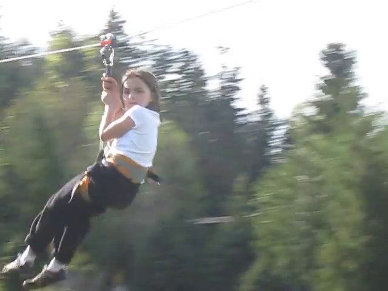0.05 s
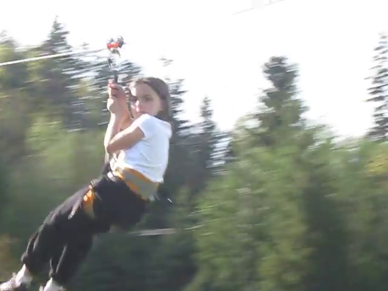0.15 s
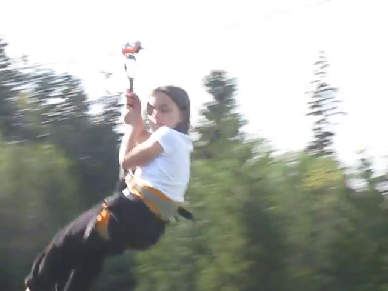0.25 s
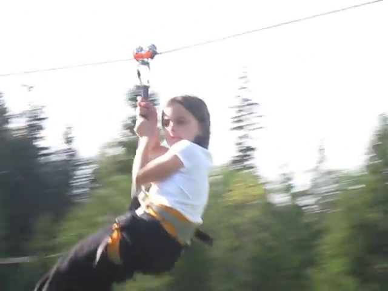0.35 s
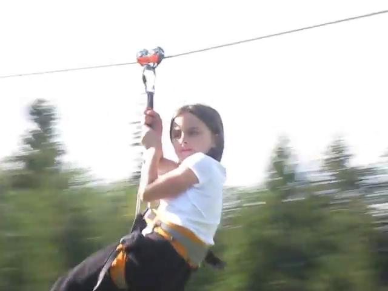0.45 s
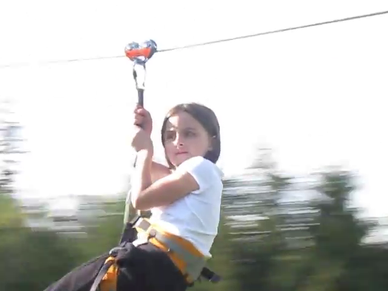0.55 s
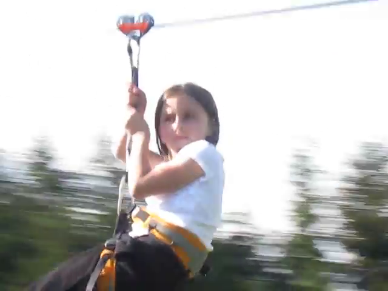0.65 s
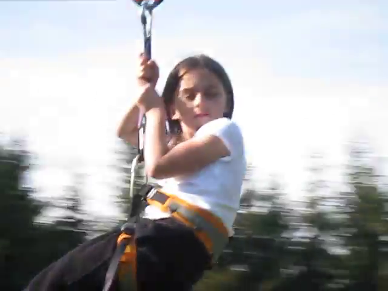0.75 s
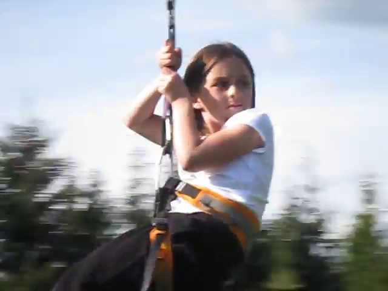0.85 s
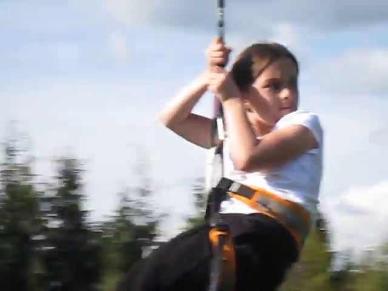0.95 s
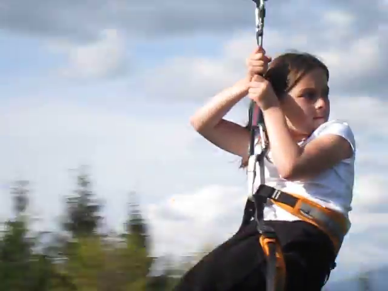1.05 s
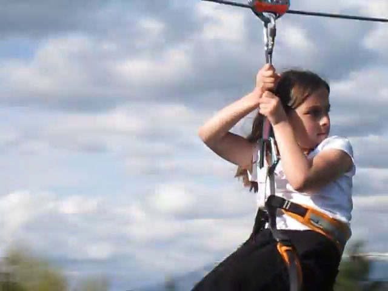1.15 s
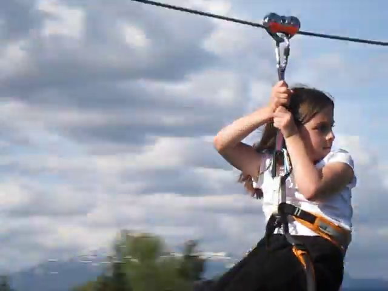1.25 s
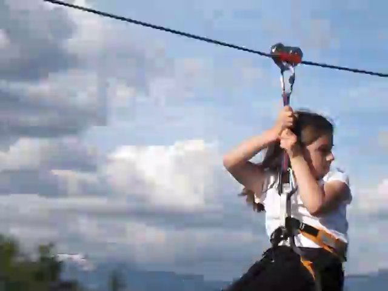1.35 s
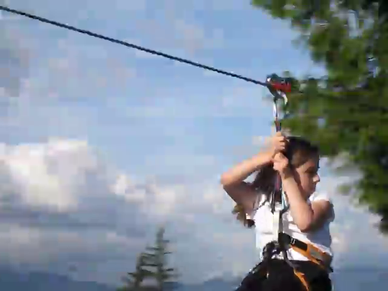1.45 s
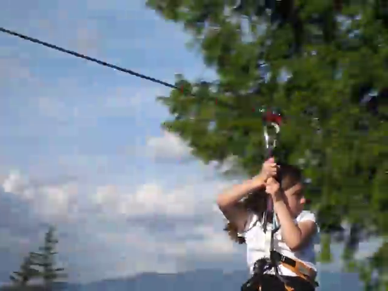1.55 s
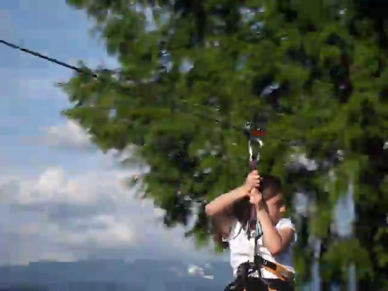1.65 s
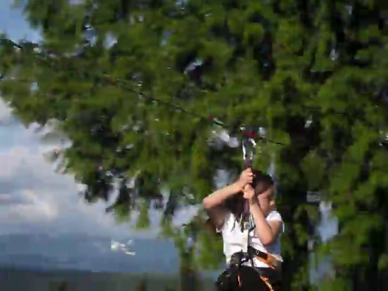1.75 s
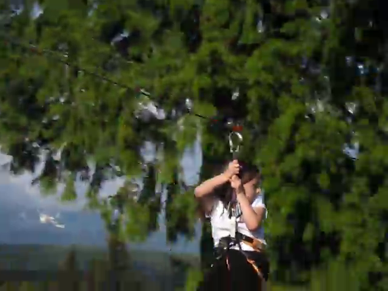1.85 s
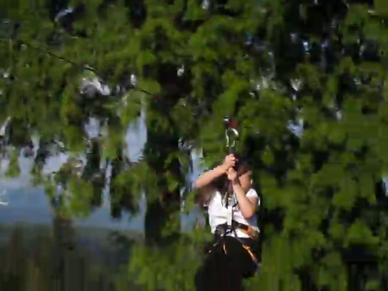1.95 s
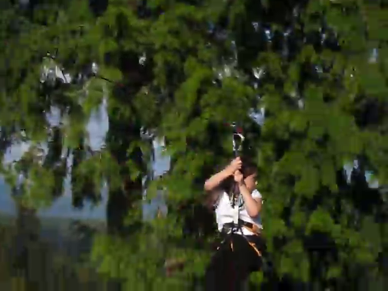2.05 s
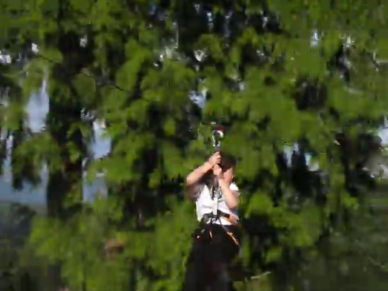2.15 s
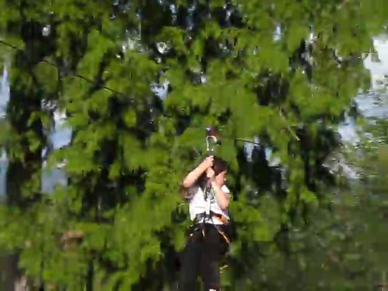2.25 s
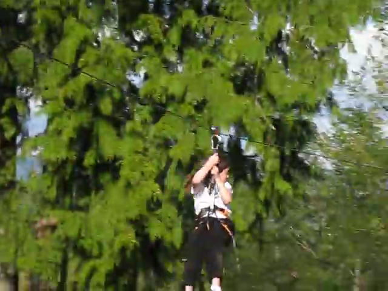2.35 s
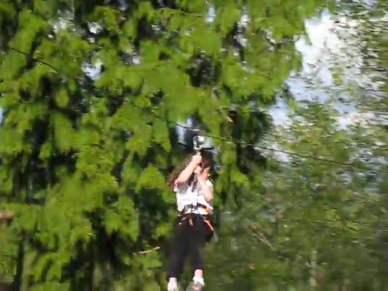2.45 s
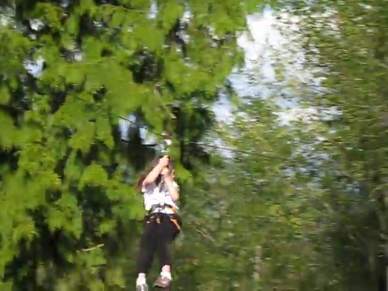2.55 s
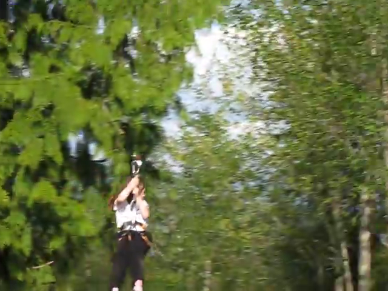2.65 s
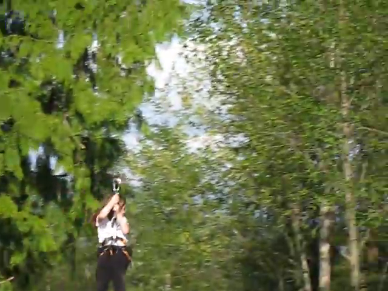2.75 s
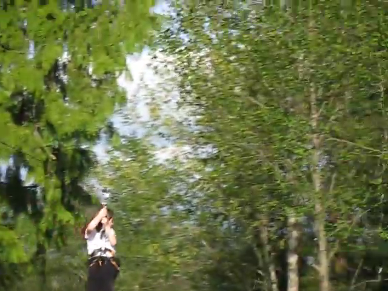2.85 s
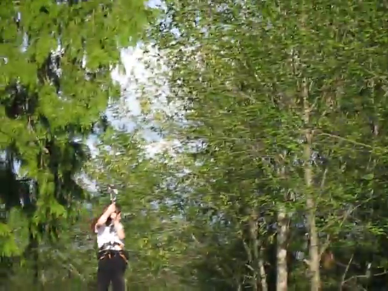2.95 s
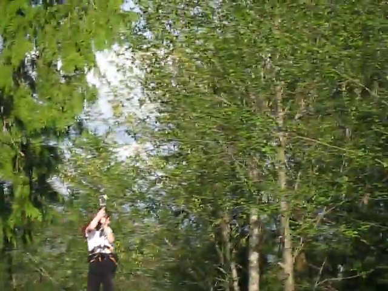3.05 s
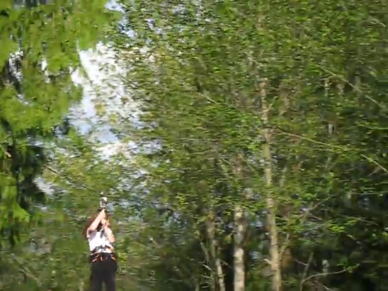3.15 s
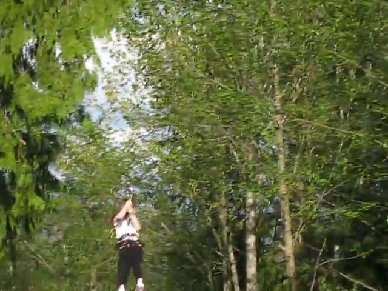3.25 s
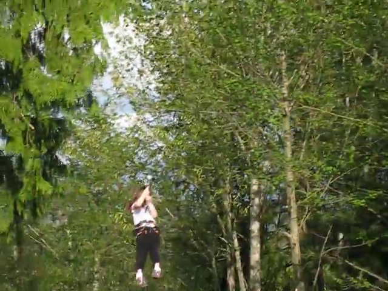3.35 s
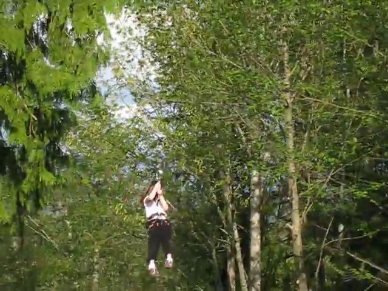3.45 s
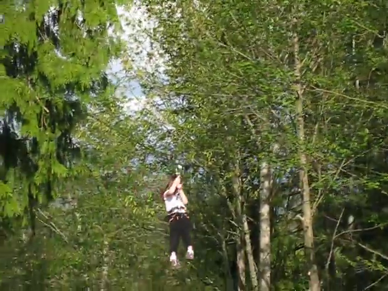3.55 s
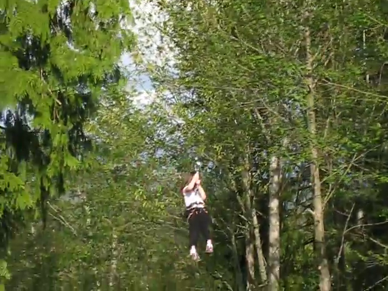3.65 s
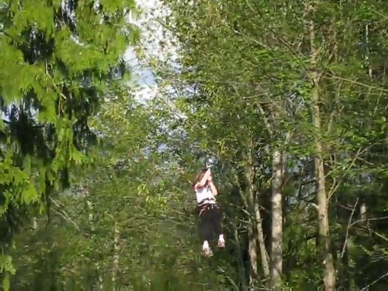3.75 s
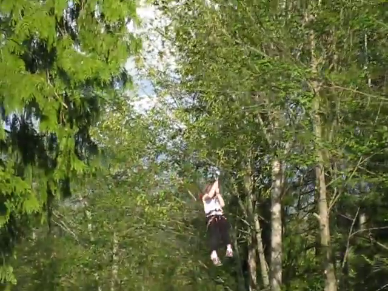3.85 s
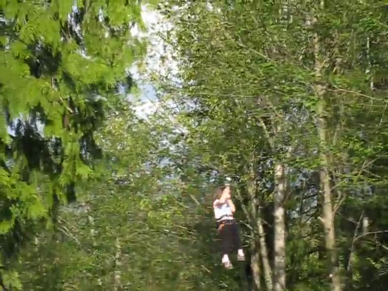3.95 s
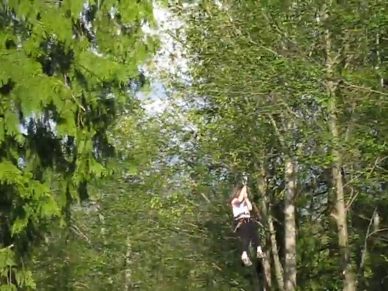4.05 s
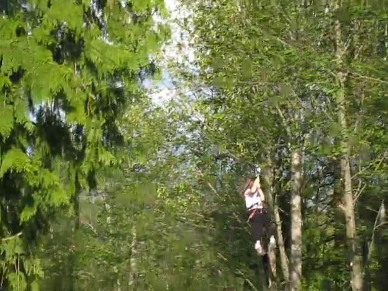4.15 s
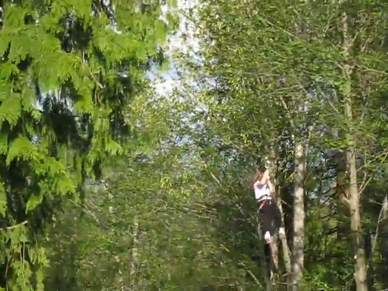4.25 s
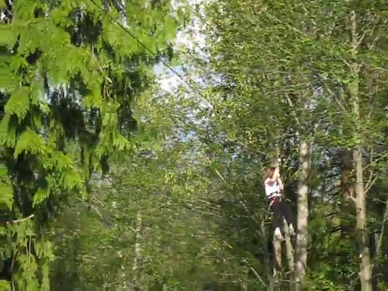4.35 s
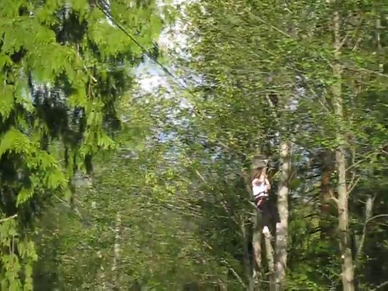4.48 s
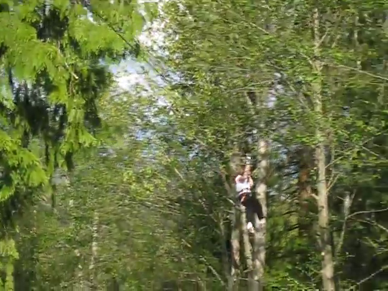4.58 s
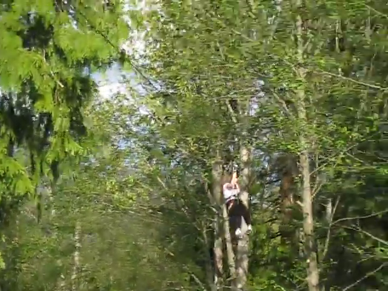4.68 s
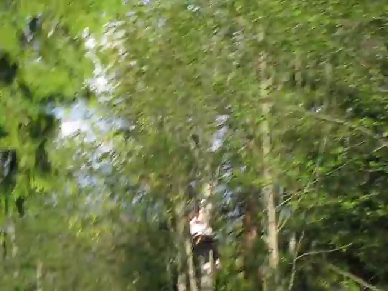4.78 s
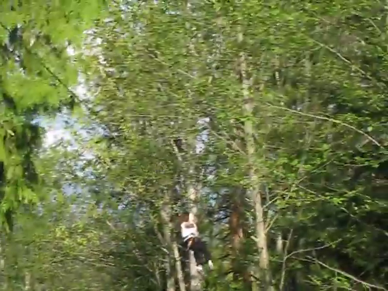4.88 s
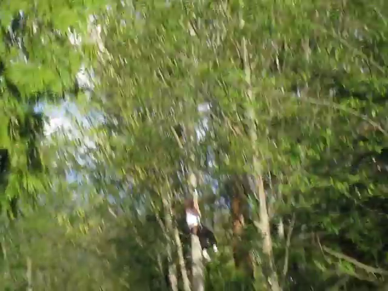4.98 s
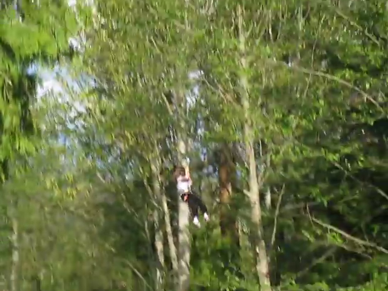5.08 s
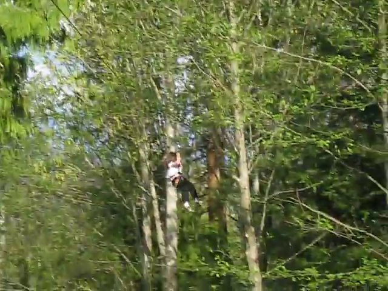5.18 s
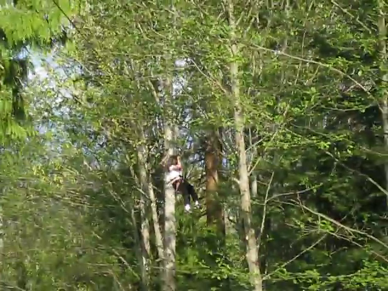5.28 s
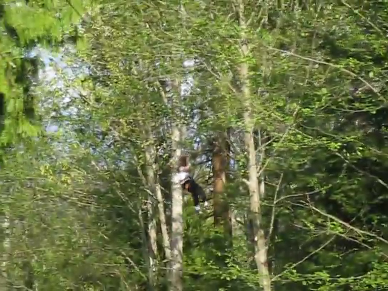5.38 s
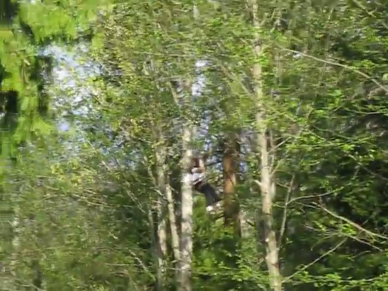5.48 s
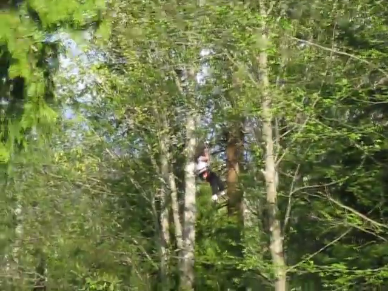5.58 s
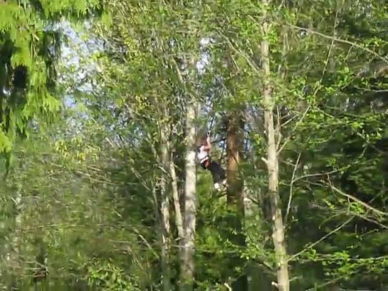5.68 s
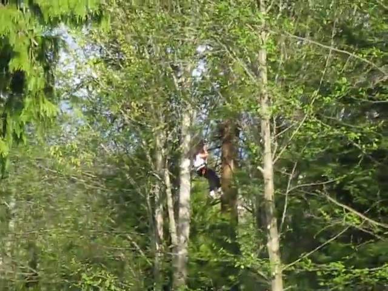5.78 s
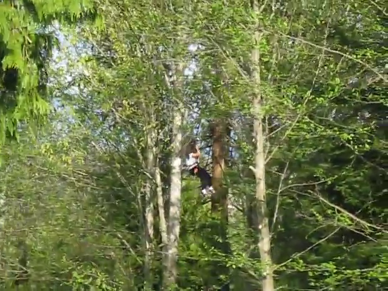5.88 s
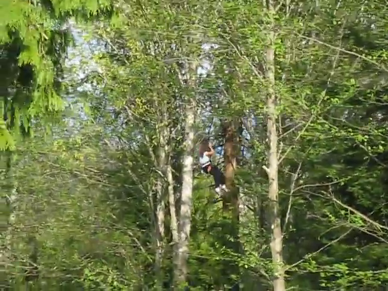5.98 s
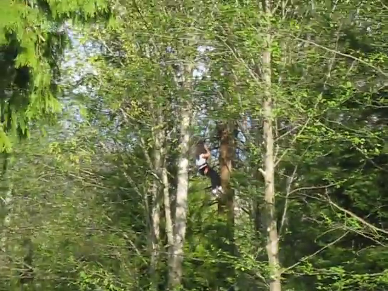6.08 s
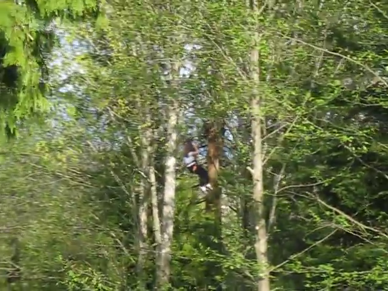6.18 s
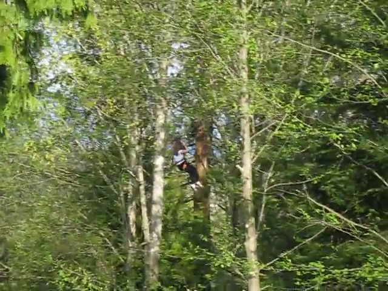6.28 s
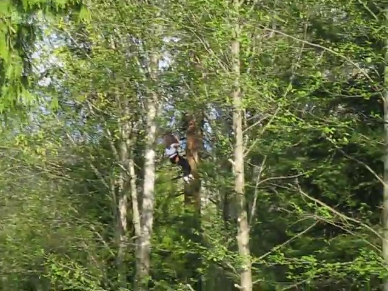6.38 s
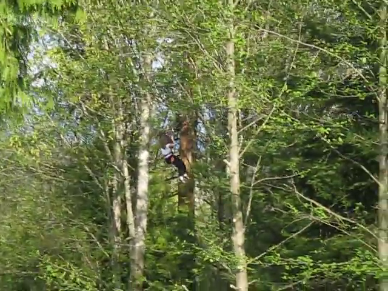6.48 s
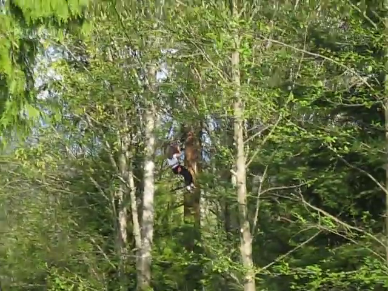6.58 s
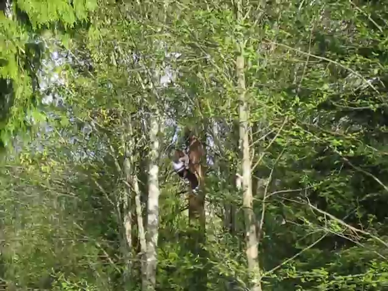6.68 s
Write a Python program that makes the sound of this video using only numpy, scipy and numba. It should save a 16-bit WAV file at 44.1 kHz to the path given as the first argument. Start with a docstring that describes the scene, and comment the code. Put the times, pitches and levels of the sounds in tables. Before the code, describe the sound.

Outdoors at a wood's edge, a pulley trolley carrying a rider is already rolling loudly on a steel cable. Its bright, gritty hiss and metallic ring sweep in colour as it passes within metres at about one second, then dwindle into the trees. A rough whine slowly sinks as it slows. Faint breeze and small wind bumps touch a nearby handheld microphone, sounding the same in both channels.

```python
"""At the edge of a wood, a zipline trolley rolls past a few metres away and on into the trees, slowing.
Its sheaves (grooved wheels) whine over the strands of the steel cable. Noise-fed resonances make the
trolley ring and hiss and the loaded cable drone; the cable also beams a band of sound that sweeps with
the viewing angle. Behind are filtered-noise outdoor air, a light breeze and puffs of wind; the recorder's
gain control holds the level flat while the trolley is close."""
import sys
import numpy as np
from scipy import signal
from scipy.fft import rfft, irfft, next_fast_len
from scipy.io import wavfile
from scipy.ndimage import uniform_filter1d
from numba import njit

SR = 44100
rng = np.random.default_rng(int(sys.argv[2]) if len(sys.argv) > 2 else 0)


def generate_wav(signal):
    """Clip the signal to [-1, 1] and save it as 16-bit WAV at the path in sys.argv[1]."""
    frames = np.transpose(np.atleast_2d(signal))
    scaled = np.clip(frames, -1, 1) * 32767
    pcm = np.round(scaled).astype(np.int16)
    wavfile.write(sys.argv[1], SR, pcm)


N = 296352
T = np.arange(N) / SR   # time of each sample [s]

# Closest moment [s], closest distance divided by speed [s], and speed [m/s]
PASS_S, PASS_TURN_S, SPEED_M_S = 0.94, 0.712, 5.4
# How often the sheaves cross a strand at the start, and the steady loss of that rate
STRAND_HZ, DRAG_HZ_PER_S = 1168, 25
# Past the sag the cable rises and slows the trolley further from this time on
UPHILL_S, UPHILL_HZ_PER_S = 3.8, 60


def from_db(db):
    """Turn decibels into a gain."""
    return 10 ** (np.asarray(db) / 20)


def rms_one(x):
    """Scale a sound to an average strength (rms) of 1."""
    return x / np.sqrt(np.mean(x ** 2) + 1e-20)


def levelled(x):
    """Even out the strength to rms 1, using a sliding window a third of a second long."""
    mean_square = uniform_filter1d(x ** 2, size=SR // 3)
    return x / np.sqrt(mean_square + 1e-20)


def in_time(rows):
    """Join the points of a table with straight lines, giving each column one value per sample."""
    times, *columns = np.transpose(rows)
    return [np.interp(T, times, column) for column in columns]


def drift(rate):
    """Slow random wandering of rms 1, changing about rate times a second."""
    step = 40   # computed every 40 samples, then joined by lines
    r = np.exp(-2 * np.pi * rate * step / SR)
    settle = 4000   # dropped while the smoothing filter settles
    white = rng.standard_normal(N // step + settle + 2)
    slow = signal.lfilter([1], [1, -2 * r, r * r], white)[settle:]
    return np.interp(np.arange(N) / step, np.arange(len(slow)), rms_one(slow))


def noise(spectrum):
    """Steady noise with a smooth spectrum; 0 dB is as strong as white noise of rms 1."""
    size = next_fast_len(N, real=True)
    hz, db = np.transpose(spectrum)
    bins = np.maximum(np.fft.rfftfreq(size, 1 / SR), 1)
    gain = from_db(np.interp(np.log(bins), np.log(hz), db))
    return irfft(rfft(rng.standard_normal(size)) * gain, size)[:N]


@njit
def resonate(x, hz, width):
    """A resonance with a movable pitch, applied twice in a row; its peak gain is 1."""
    r = np.exp(-np.pi * width / SR)
    g = (1 - r * r) / 2
    y, z, c = np.zeros(len(x)), np.zeros(len(x)), 0.
    for i in range(2, len(x)):
        if i % 16 == 2:   # follow the pitch every 16 samples
            c = 2 * r * np.cos(2 * np.pi * hz[i] / SR)
        y[i] = g * (x[i] - x[i - 2]) + c * y[i - 1] - r * r * y[i - 2]
        z[i] = g * (y[i] - y[i - 2]) + c * z[i - 1] - r * r * z[i - 2]
    return z


def rubbed(hz, width):
    """One resonance kept ringing by countless tiny contacts, played by white noise."""
    contacts = rng.uniform(-np.sqrt(3), np.sqrt(3), N)
    return resonate(contacts, hz, float(width))


def below(x, hz, order):
    """Keep the part of a sound under a frequency, without delaying it."""
    return signal.sosfiltfilt(signal.butter(order, hz, fs=SR, output="sos"), x)


# Outdoor background spectrum: (frequency [Hz], level per Hz [dB])
AIR_SPECTRUM = [(20, -10), (60, -8), (130, -0.6), (230, -2.5), (350, 2), (600, 0), (1000, 3.5), (1400, 1.5),
                (2000, -1.5), (5000, -12), (15000, -23)]
# Puffs of wind on the microphone: (time [s], level [dB], half length [s])
WIND_PUFFS = [(0.457, -48, .019), (.63, -60, 0.065), (1.022, -50.5, 0.023), (1.073, -51, .022),
              (1.75, -56, .09), (1.953, -52, .059), (2.028, -44.5, 0.032), (2.5, -47, .02),
              (2.585, -46.5, .025), (2.676, -52, .025), (3.75, -62, .04)]
# Wind rumble spectrum: (frequency [Hz], level per Hz [dB])
WIND_SPECTRUM = [(15, -11), (35, 1.5), (80, 4), (130, -5.5), (220, -7.5), (330, -18), (1500, -55)]


def outdoors(air_db=-49.5, breeze_db=-71, breeze_swing_db=2.5):
    """Soft wash of the woods; light breeze and puffs of wind rumble on the microphone."""
    gusts = 0
    for time, db, half in WIND_PUFFS:
        swell = np.exp(-np.minimum(((T - time) / half) ** 2, 50))
        gusts = gusts + from_db(db) * swell
    breeze = from_db(breeze_db + breeze_swing_db * drift(8))
    air = from_db(air_db) * rms_one(noise(AIR_SPECTRUM))
    return air + (gusts + breeze) * rms_one(noise(WIND_SPECTRUM))


def with_ground(x, strength, lag_s=.0067, turn_s=0.916, grass_hz=3000):
    """Grass returns a dull echo, latest and clearest abreast: a comb filter sweeping down, then up."""
    nearness = 1 / np.hypot(1, (T - PASS_S) / turn_s)
    echo = signal.sosfilt(signal.butter(2, grass_hz, fs=SR, output="sos"), x)
    return x + strength * nearness * np.interp(T - lag_s * nearness, T, echo)


def through_air(x, top_hz=11500, loss_db_per_s=2.1):
    """Air absorbs the top treble with distance, here per second before or after the closest moment."""
    body = below(x, top_hz, order=2)
    return body + (x - body) * from_db(-loss_db_per_s * np.abs(T - PASS_S))


# Resonances of the loaded cable, levels relative to each other: (frequency before Doppler [Hz],
# width of each filter pass [Hz], level side-on [dB], level end-on [dB], loss per 100 Hz of strand rate lost [dB])
CABLE_DRONE_MODES = [(574, 171, -4.5, 1, 3), (1062, 163, -1, -5.5, -2), (1166, 160, -2, -1.5, -0.5),
                     (1493, 366, 3, -2, 5.5), (1702, 188, 1, 8.5, 3.5), (1875, 145, 0, -20, -0.5),
                     (2317, 410, -3, 0.5, 2.5)]


def drone(angle, doppler, slowing, sway_db=1.24):
    """The loaded cable's low resonances change their balance with viewing angle and slowing."""
    abreast = np.cos(angle)
    total = 0
    for hz, width, side_db, end_db, loss_db in CABLE_DRONE_MODES:
        view_db = end_db + (side_db - end_db) * abreast
        db = view_db - loss_db * slowing + sway_db * drift(3.9)
        total = total + from_db(db) * rubbed(hz * doppler, width)
    return levelled(with_ground(total, strength=.65))


def cable_beam(angle, coincidence_hz=5610, breadth_hz=2200, beam_db=-4.5, droop=1.26):
    """Faster bending waves leave the cable more steeply, so each viewing angle gets its own frequency."""
    # At the coincidence frequency, bending waves travel as fast as sound
    hz = np.minimum(coincidence_hz / (np.sin(angle) ** 2 + 1e-6), 19000)
    gain = from_db(beam_db) * np.cos(angle) * (coincidence_hz / hz) ** droop
    return gain * rubbed(hz, breadth_hz)


# Sheaves and cable seen end-on, relative levels:
# (frequency before Doppler [Hz], width of each filter pass [Hz], level [dB])
END_ON_MODES = [(2880, 310, -9), (3526, 94, 2.5), (3723, 630, -3.5), (4074, 420, -1.1), (4590, 800, -6),
                (6190, 380, -12.5), (6830, 290, -10), (7960, 100, -17), (8940, 550, -20.5),
                (9470, 360, -20.5), (10430, 360, -23), (13600, 240, -25), (14110, 350, -20)]
# Hiss heard end-on: (frequency [Hz], relative level per Hz [dB])
END_ON_HISS = [(400, -35), (900, -30), (2000, -19), (2400, -17.5), (2800, -11), (3500, -6), (4800, -9.5),
               (5600, -15), (7000, -17.5), (8000, -21), (11000, -23), (13500, -22), (15500, -27)]


def end_ring(doppler):
    """Seen along the cable, the hiss gathers in a cluster of sheave resonances."""
    total = noise(END_ON_HISS)
    for hz, width, db in END_ON_MODES:
        total += from_db(db) * rubbed(hz * doppler, width)
    return total


# Trolley plates seen side-on, relative levels: (frequency before Doppler [Hz],
# width of each filter pass [Hz], level [dB], lobe direction [rad], lobe rate [per rad])
PLATE_MODES = [(3030, 670, -1.5, -0.28, 0.73), (3475, 110, 11, 0.14, 1.41), (3555, 320, 7, 0.084, 1.9),
               (4580, 184, 3.5, -1.13, 1.55), (4950, 770, 1, -0.37, 1.52), (4904, 140, 8.5, 0.22, 1.3),
               (6475, 510, -2, 0.18, 3.3), (6930, 350, -1, 0.076, 4.1), (7630, 540, -7.5, -0.064, 3.3),
               (9430, 370, -4, 0.42, 4.4), (10440, 180, -5, 0.57, 3), (12150, 150, -8.5, 0.018, .78),
               (13240, 380, -7.5, 0.03, 5.1), (14100, 400, -8, -.35, 3.5), (14740, 280, -10, -.3, 3.2)]
# Hiss heard side-on: (frequency [Hz], relative level per Hz [dB])
SIDE_ON_HISS = [(400, -44), (900, -21), (2100, -15), (2500, -10.5), (3000, -12.5), (4100, -6.5),
                (5300, -10), (6000, -9), (8200, -15), (9200, -10.5), (11300, -16.5), (15500, -23)]


def side_ring(angle, doppler, lobe_floor=0.22):
    """Each plate resonance sends sound in lobes, which sweep over the listener during the pass."""
    total = noise(SIDE_ON_HISS)
    for hz, width, db, aim, lobe_rate in PLATE_MODES:
        lobe = lobe_floor + (1 - lobe_floor) * np.abs(np.cos(lobe_rate * (angle - aim)))
        total += from_db(db) * lobe * rubbed(hz * doppler, width)
    return total


def jolts(per_s, size_db, decay_s):
    """Gain that jumps at random moments, as when a sheave meets a proud wire, and dies away."""
    struck = rng.random(N) < per_s / SR
    hits = struck * np.minimum(rng.exponential(1, N), 3)
    fading = signal.lfilter([1], [1, -np.exp(-1 / (decay_s * SR))], hits + 1e-18)
    return 1 + from_db(size_db) * fading


# How hard the sheaves bite into the cable as the rider swings past: (time [s], level [dB])
CABLE_BITE = [(.15, -0.8), (.4, 2.3), (.5, -2.5), (.64, 1.5), (.87, 2), (1.07, 0), (1.4, 3.5), (1.57, -1),
              (1.85, 1.8), (2.1, 0.5), (2.5, 1.7), (2.8, -1.1), (3.8, 1.2)]
# Top treble: level trim [dB], and its share of the bite
SIZZLE_DB, SIZZLE_BITE = 0.44, 0.44
# Drone against the ring: base level [dB], gain side-on [dB], gain per 100 Hz of strand rate lost [dB]
DRONE_DB, DRONE_SIDE_ON_DB, DRONE_SLOW_DB = -16.5, 4, 0.96


def rolling(angle, doppler, rate, side_focus=1.4, end_focus=2.9, split_hz=7500):
    """Rolling noise, coloured by the viewing angle and shaken by the changing contact."""
    metal = np.cos(angle) ** side_focus * side_ring(angle, doppler)
    metal += cable_beam(angle)
    metal += np.abs(np.sin(angle)) ** end_focus * end_ring(doppler)
    metal = levelled(through_air(with_ground(metal, strength=0.14)))
    low = below(metal, split_hz, order=6)
    high = metal - low

    bite_db, = in_time(CABLE_BITE)
    load_db = drift(24)   # the sheaves bear now harder, now lighter
    sizzle_db = SIZZLE_DB + SIZZLE_BITE * bite_db + 0.48 * load_db
    sizzle = from_db(sizzle_db) * high * jolts(per_s=150, size_db=-8.0, decay_s=0.002)
    ring = from_db(0.47 * load_db) * low * jolts(per_s=73, size_db=-11.5, decay_s=0.0026)

    slowing = (STRAND_HZ - rate) / 100   # strand rate lost, in hundreds of Hz
    drone_db = DRONE_DB + DRONE_SIDE_ON_DB * np.cos(angle) + DRONE_SLOW_DB * slowing
    drone_db = drone_db + bite_db + 0.34 * load_db
    return ring + sizzle + from_db(drone_db) * drone(angle, doppler, slowing)


# Strand tone against the ring: (time [s], level [dB])
STRAND_TONE_LEVEL = [(0, -20), (.85, -25), (1.4, -29.5), (3.3, -18), (4.2, -23.5), (5.45, -22),
                     (5.65, -17.5), (6.72, -12.5)]
# Its lower octave against the ring: (time [s], level [dB])
LOWER_OCTAVE_LEVEL = [(0, -21), (.45, -33), (2.2, -29), (2.8, -18), (3.3, -26), (4.2, -21.5), (4.8, -35)]


def whine(rate, wander=0.004, flutter_db=2.5, tone_width_hz=60, octave_width_hz=55, rough=0.7):
    """Strands drum on the sheaves; their uneven lay blurs the tone and adds a rough lower octave."""
    tone_db, = in_time(STRAND_TONE_LEVEL)
    octave_db, = in_time(LOWER_OCTAVE_LEVEL)
    phase = 2 * np.pi * np.cumsum(rate * (1 + wander * drift(15.9))) / SR
    clear = rms_one(np.sin(phase) * from_db(flutter_db * drift(18)))
    tone = clear + rough * rms_one(rubbed(rate, tone_width_hz))
    octave = rubbed(rate / 2, octave_width_hz)
    return from_db(tone_db) * levelled(tone) + from_db(octave_db) * levelled(octave)


def ride(roll_db=-17.6, speed_power=0.82, grass_loss_db_per_s=0.7959):
    """The run gives viewing angle (0 abreast), Doppler factor, strand rate [Hz] and trolley level [dB]."""
    angle = np.arctan((T - PASS_S) / PASS_TURN_S)
    doppler = 1 / (1 + SPEED_M_S * np.sin(angle) / 343)   # speed of sound 343 m/s
    rate = STRAND_HZ - DRAG_HZ_PER_S * T - UPHILL_HZ_PER_S * np.maximum(T - UPHILL_S, 0)
    nearness = np.cos(angle)   # closest distance over present distance
    loudness = nearness * (rate / STRAND_HZ) ** speed_power
    # Grass and foliage take more for each second of travel from the closest point
    foliage_db = grass_loss_db_per_s * np.abs(T - PASS_S)
    level_db = roll_db + 20 * np.log10(loudness) - foliage_db
    return angle, doppler, rate, level_db


def scene():
    """The trolley fades with distance and lost speed; one microphone feeds both channels."""
    angle, doppler, rate, level_db = ride()
    trolley = from_db(level_db) * (rolling(angle, doppler, rate) + whine(rate * doppler))
    return np.tile(trolley + outdoors(), (2, 1))


def record(dry, gain_limit_db=-21, gain_window_s=0.27, cutoff_hz=15750):
    """Gain control holds down the mean level, ducking the background too; the top is cut steeply."""
    mean_square = uniform_filter1d(dry[0] ** 2, size=int(gain_window_s * SR))
    level = np.sqrt(mean_square + 1e-20)
    held = dry * np.minimum(1, from_db(gain_limit_db) / level)
    return signal.sosfilt(signal.ellip(12, .1, 90, cutoff_hz, fs=SR, output="sos"), held)


dry = scene()
out = record(dry)
generate_wav(out)
```